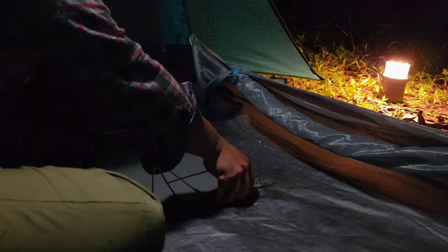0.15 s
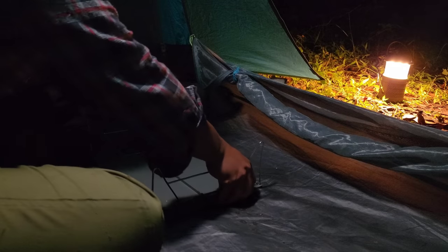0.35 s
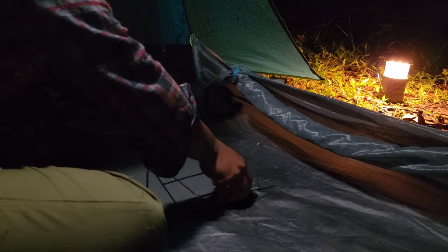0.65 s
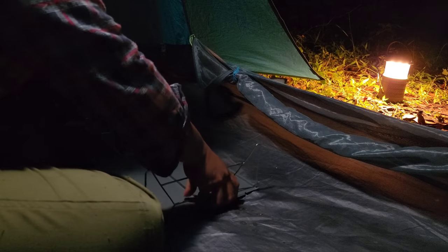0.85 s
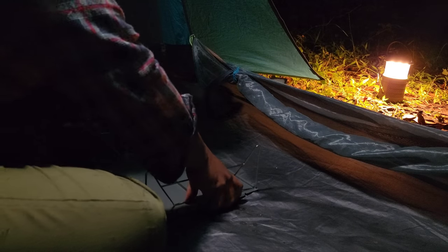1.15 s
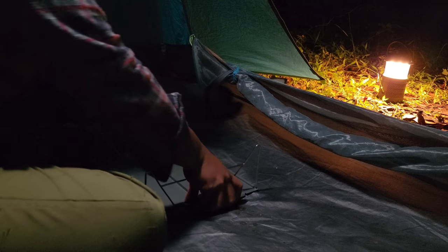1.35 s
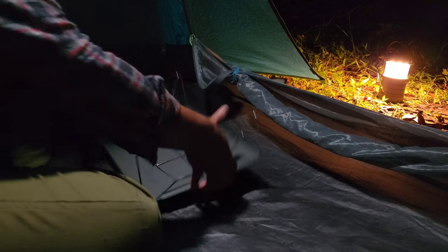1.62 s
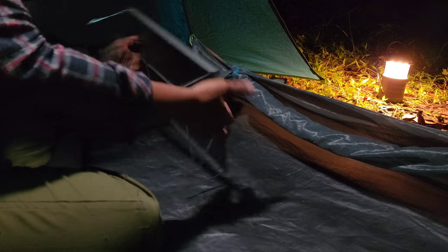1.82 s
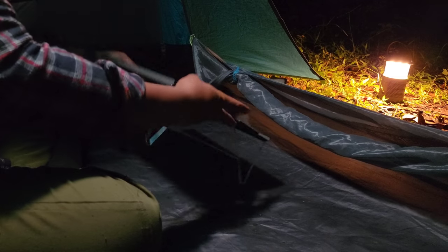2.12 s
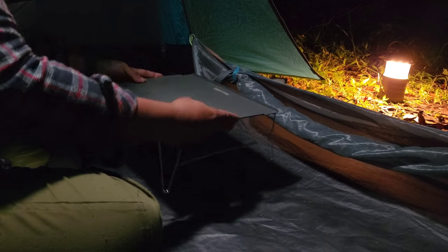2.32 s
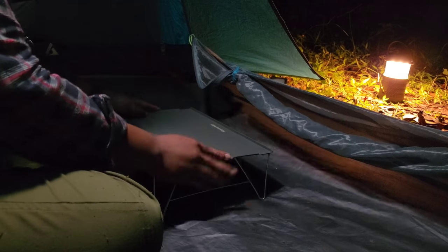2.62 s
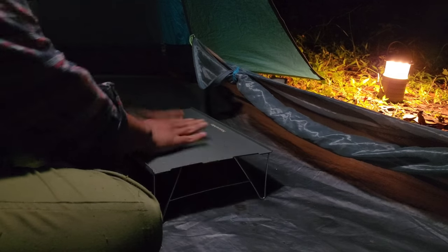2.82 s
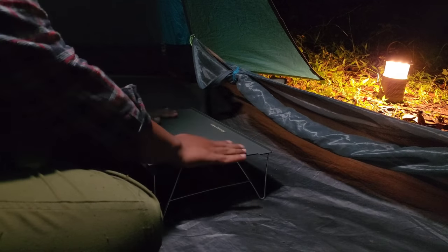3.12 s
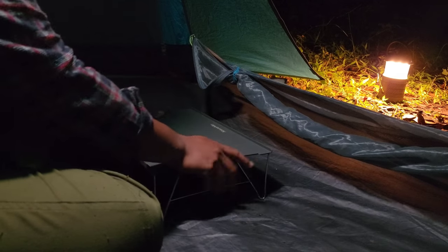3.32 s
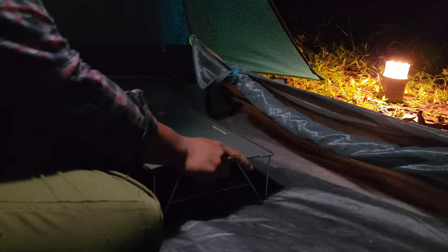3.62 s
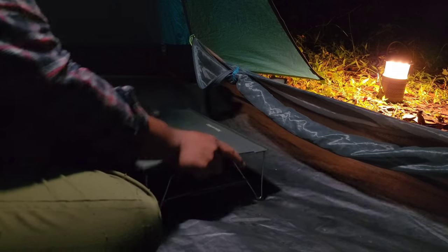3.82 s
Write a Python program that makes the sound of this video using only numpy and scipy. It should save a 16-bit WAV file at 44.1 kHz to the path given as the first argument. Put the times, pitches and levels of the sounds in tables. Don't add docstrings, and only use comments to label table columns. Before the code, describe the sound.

A small folding table is handled close up in a tent. Faint knocks lead to a loud metallic latch snap at 0.4 s, then light scrapes and knocks. A wire leg clicks free at 1.45 s, followed by tinks and rustles until 2.3. Hard thuds land near 2.55, 3.1 and 3.67 s, with palm scrapes between. Faint insects, hiss and distant rumble continue beneath.

```python
import sys
import numpy as np
from scipy import signal
from scipy.fft import rfft, irfft
from scipy.io import wavfile
from scipy.ndimage import uniform_filter1d, map_coordinates

SR = 44100
rng = np.random.default_rng(int(sys.argv[2]) if len(sys.argv) > 2 else 0)


def invert_db(x):
    u = np.asarray(x, float) / 20
    return 10 ** u


def int16_out(signal):
    q = np.round(np.clip(np.atleast_2d(signal).T, -1, 1) * 32767)
    wavfile.write(sys.argv[1], SR, q.astype(np.int16))


N = 174195
TIME = np.arange(N) / SR


def evened(x):
    return x / np.sqrt(np.mean(x ** 2) + 1e-20)


def read(points, hz):
    f, value = np.transpose(points)
    return np.interp(np.log(hz + 1), np.log(f + 1), value)


def add(mix, start_s, sound):
    k = max(round(start_s * SR), 0)
    part = mix[..., k:k + sound.shape[-1]]
    part += sound[..., :part.shape[-1]]


def tinted(x, gain):
    length = x.shape[-1]
    return irfft(rfft(x) * gain(np.fft.rfftfreq(length, 1 / SR)), length)


def hump(t, rise, fall, shape=1):
    before = np.exp(-3 * (t / abs(rise)) ** 2)
    after = np.exp(-2.3 * (np.maximum(t, 0) / abs(fall)) ** shape)
    return np.where(t < 0, before, after)


def struck(modes, rattle_s, chance, seconds, bounce_db=-16.0, spread_db=2):
    bounces_per_s = 900
    t = np.arange(0, seconds, 1 / SR)
    ring = np.zeros(len(t))
    for k, (hz, db, t60) in enumerate(modes):
        ring += (-1) ** k * invert_db(db - 60 * t / max(t60, .003)) * np.sin(2 * np.pi * hz * t)
    when, size, sign = chance[:, :len(t)]
    bounce_level = spread_db * np.minimum(-np.log(size + 1e-9), 2) + bounce_db
    bounces = (when < bounces_per_s / SR) * invert_db(bounce_level) * np.sign(sign - .5)
    blows = bounces * np.exp(-(t / max(rattle_s, .001)) ** 4) + (t == 0)
    out = signal.fftconvolve(blows, ring)[:len(t)]
    return out / abs(out).max()


# f/Hz, likeness 0-1
LIKENESS = [(250, 0.3), (950, 0.1), (4000, 0.043)]


def field(shape, patch_db, size, likeness=LIKENESS):
    frames, hz = N * 4 // size + 5, np.fft.rfftfreq(size, 1 / SR)
    a, b, c, d, patches = rng.standard_normal((frames, len(hz), 5)).T
    patches = uniform_filter1d(uniform_filter1d(patches, size=10, axis=0), size=8, axis=1)
    same = np.clip(read(likeness, hz), -1, 1)[:, None]
    left = a + 1j * b
    right = same * left + np.sqrt(1 - same ** 2) * (c + 1j * d)
    z = np.array([left, right]) * invert_db(shape(hz)[:, None] + patch_db * evened(patches))
    return evened(signal.istft(z, nperseg=size, noverlap=size * 3 // 4)[1][:, :N])


# f/Hz, level/dB per Hz
RUMBLE_COLOUR = [(20, -38), (35, -62), (55, 2.5), (85, 3), (130, -7.5), (200, -20), (350, -47.5)]
# t/s, level/dB
RUMBLE_SWELL = [(0, -42), (.4, -33.5), (.65, -34), (1.3, -35), (1.6, -40.5), (3.299, -37), (3.95, -38.5)]


def rumble():
    top_hz = RUMBLE_COLOUR[-1][0]
    noise = field(lambda hz: read(RUMBLE_COLOUR, hz) - 80 * (hz > top_hz), 3.3, 4096, [(60, 0.97)])
    return noise * invert_db(np.interp(TIME, *np.transpose(RUMBLE_SWELL)) + 2.5)


# f/Hz, level/dB per Hz
HISS_COLOUR = [(250, -3.5), (500, -8), (1500, -5), (3000, -6), (5700, -10.5), (8000, -9), (10300, -19.5),
               (15500, -18.5)]


def hiss():
    return invert_db(-48.5) * field(lambda hz: read(HISS_COLOUR, hz) - 60 * (hz < 200), 2.4, 1024)


# f/Hz, width/Hz, level/dB
INSECT_BANDS = [(6200, 500, -69), (6592, 390, -47.5), (6890, 330, -47), (3000, 120, -58.5),
                (4960, 520, -58)]


def insects():
    def power(hz):
        return sum(invert_db(2 * db) / w * np.exp(-4 * ((hz - f) / w) ** 2) for f, w, db in INSECT_BANDS)

    total = np.sqrt(sum(invert_db(2 * db) for f, w, db in INSECT_BANDS))
    return total * field(lambda hz: 10 * np.log10(power(hz) + 1e-30), .8, 512)


# peak t/s, rise t/s, fall t/s, level/dB, tilt/dB per octave
STROKES = [(0.031, 0.012, 0.05, -41, 2), (0.426, 0.0097, 0.022, -14, 0), (.74, 0.12, 0.089, -36, 2.5),
           (0.839, 0.071, 0.08, -40.5, 5.5), (.95, 0.11, 0.11, -43, 0.8), (1.21, 0.0033, 0.019, -36.5, 3),
           (1.27, 0.21, 0.13, -53, 6), (1.456, 0.014, 0.052, -26, 6.5), (1.557, 0.04, 0.043, -34.5, 1),
           (1.615, .008, 0.041, -44.5, 4.5), (1.698, 0.02, 0.026, -38, 6), (1.747, 0.014, 0.017, -30, 5.5),
           (1.839, 0.078, 0.067, -35, 4.5), (1.928, 0.011, 0.03, -25, 7), (2.121, 0.024, 0.12, -38.5, 5),
           (2.236, 0.0068, 0.03, -35.5, 5.5), (2.312, 0.0081, 0.031, -33, -5),
           (2.537, 0.013, 0.012, -17, 3.5), (2.571, 0.023, 0.031, -17, 2.1), (2.68, 0.06, 0.11, -50.5, 5),
           (2.819, 0.12, 0.16, -38, 5), (2.959, 0.055, 0.042, -40.5, 2.7), (3.15, 0.16, 0.11, -26, 7.5),
           (3.33, 0.19, 0.15, -40.5, 6), (3.52, 0.059, 0.072, -43, 2.5), (3.595, 0.012, 0.04, -34.5, -1.5),
           (3.678, 0.038, 0.031, -21.5, 4), (3.73, 0.037, 0.1, -41, 4), (3.87, 0.052, 0.071, -37.5, 4),
           (3.95, 0.03, .03, -29.5, 3)]
# f/Hz, level/dB per Hz
RUB_COLOUR = [(300, 17), (1400, 12.5), (3000, 8), (5800, 0.5), (8000, 1.5), (10400, -10), (12300, -6.5),
              (15200, -14.5)]


def scrapes():
    grains_per_s, grain_spread_db, slip_db = 8000, 3, 1.6
    grains = rng.random((3, N)) < grains_per_s / SR
    grains = grains * invert_db(grain_spread_db * rng.exponential(1, (3, N)))
    grains = grains * rng.standard_normal((3, N))
    grains = grains * invert_db(slip_db * evened(uniform_filter1d(rng.standard_normal(N), size=130)))
    shared_and_own = grains[0] + 1.9 * grains[1:]
    rub = evened(tinted(shared_and_own, lambda hz: invert_db(read(RUB_COLOUR, hz) - 10 * (hz < 250))))
    out = np.zeros((2, N))
    for s, rise, fall, db, tilt_db in STROKES:
        a, b = max(round((s - .2) * SR), 0), min(round((s + .3) * SR), N)
        stroke = evened(tinted(rub[:, a:b], lambda hz: invert_db(tilt_db * np.log2((hz + 100) / 4000))))
        out[:, a:b] += invert_db(db) * stroke * hump(TIME[a:b] - s, rise, fall, 0.42 + 8 * fall)
    return out


# t/s, peak level/dB, body f/Hz, brightness/dB per octave
TOP_KNOCKS = [(0.177, -40.5, 720, -3.5), (0.302, -33.5, 920, -0.5), (0.557, -38.5, 935, 2),
              (0.616, -37, 630, -2), (0.672, -25, 930, 0), (0.909, -27, 686, 0.5), (0.993, -30.5, 770, -4),
              (1.057, -41.5, 770, -0.5), (1.111, -40.5, 1140, -0.5), (1.208, -27.5, 760, 5.5),
              (1.4924, -12.5, 590, -2.5), (1.55, -23, 610, -3), (1.606, -24, 690, -0.5),
              (2.307, -19.5, 592, 0.5), (2.838, -23.5, 1300, 3), (2.8639, -21, 556, -5.5),
              (3.0917, -23, 1550, -2.5), (3.1015, -9, 602, -6), (3.236, -24.5, 1410, -9),
              (3.501, -36, 686, -2), (3.527, -31.5, 1480, -3), (3.586, -19, 710, 2.5),
              (3.639, -38, 600, -4.5), (3.845, -23.5, 1580, -1), (3.87, -42, 990, 1)]
# multiple of the body pitch, width/Hz, level/dB
TOP_MODES = [(.66, 320, -6.5), (1, 260, -1), (1.55, 320, -4), (2.2, 1130, 2.5), (3.3, 230, -8),
             (5, 2700, -0.5)]


def knocks():
    contact_lag_s, hardness = 0.001715, 0.48
    out = np.zeros(N)
    for s, db, hz, bright_db in TOP_KNOCKS:
        body = [(hz * m, mode_db + bright_db * np.log2(m), 2.14 / w) for m, w, mode_db in TOP_MODES]
        blow = struck(body, 0.0064, rng.random((3, 6000)), .06)
        add(out, s + contact_lag_s, invert_db(db + 8.5) * signal.lfilter([hardness], [1, hardness - 1], blow))
    return out


# f/Hz, level/dB, time to fall 60 dB t/s
LATCH_MODES = [(816, -6, 0.026), (1156, -4.5, 0.027), (1480, -3.5, 0.024), (2650, 1, 0.014),
               (3760, 3, 0.0061), (4800, -16, 0.012), (7800, -12, 0.0066)]


def latch():
    out, chance = np.zeros(N), rng.random((3, 6000))
    snap = struck(LATCH_MODES, 0.012, chance, .12, bounce_db=6.0, spread_db=-5.0)
    add(out, 0.4202, invert_db(-2.5) * snap)
    return out


# t/s, level/dB, f/Hz, fall t/s
GROUND_THUDS = [(0.423, -22, 161, 0.014), (1.496, -16.5, 139, 0.017), (2.539, -18.5, 141, 0.01),
                (2.564, -9.5, 101, 0.025), (2.869, -31, 200, 0.038), (2.956, -22, 211, 0.0047),
                (3.102, -17, 150, 0.018), (3.653, -19.5, 112, 0.02), (3.672, -3.5, 140, 0.0095),
                (3.684, -11.5, 114.6, 0.015), (3.945, -20.5, 123, 0.018)]
# multiple of its pitch, level/dB
THUD_OVERTONES = [(2.1, -10), (3.6, -21.5), (5.4, -14.5)]


def thuds():
    out, t = np.zeros(N), np.arange(-.04, .12, 1 / SR)
    for s, db, hz, fall in GROUND_THUDS:
        push = np.sin(2 * np.pi * hz * t)
        for (multiple, overtone_db), phase in zip(THUD_OVERTONES, rng.random(4)):
            push += invert_db(overtone_db) * np.sin(2 * np.pi * (multiple * hz * t + phase))
        add(out, s - .04, invert_db(db) * push * hump(t - 0.11 / hz, 0.43 * fall, fall, 0.72))
    return out


# t/s, level/dB
CLASP_TICKS = [
    (1.2092, -46),
    (1.4545, -12),
    (1.4585, -10),
    (1.4638, -17),
    (1.9265, -20),
    (1.9315, -35),
    (2.537, -13),
    (2.543, -21),
    (3.671, -13),
]
# f/Hz, level/dB, time to fall 60 dB t/s
CLASP_MODES = [(5180, -22, .02), (6250, -1, .018), (7800, 2, .02), (9600, -4, 0.017), (10110, 0, 0.022),
               (12000, -1, 0.018), (13340, -1, 0.024), (14500, -9, .015)]


def clasp_ticks():
    out = np.zeros(N)
    for s, db in CLASP_TICKS:
        add(out, s, invert_db(db) * struck(CLASP_MODES, 0.0011, rng.random((3, 2000)), .04, bounce_db=-2.0))
    return out


# t/s, level/dB, f/Hz that wakes most, chatter t/s
WIRE_TOUCHES = [(1.4545, -21.5, 3000, 0.012), (1.693, -23.5, 3000, 0.0038), (1.700, -22.5, 3640, 0.0044),
                (1.742, -20, 2740, 0.0047), (1.750, -30.5, 1690, 0.0049), (1.766, -26, 4230, 0.008),
                (1.835, -22.5, 1570, 0.0055), (1.845, -28.5, 3220, 0.0042), (1.926, -26.5, 7100, 0.012),
                (2.117, -27.5, 2640, 0.0048), (2.121, -27.5, 7500, 0.0052), (2.135, -32, 2580, .001),
                (2.148, -27.5, 2580, 0.0011), (2.149, -31, 8000, 0.0044), (2.235, -31.5, 6350, 0.0037),
                (2.242, -29, 3570, 0.011), (2.534, -19, 2220, 0.0049), (2.841, -40, 3220, .002),
                (2.880, -38, 3100, 0.0024), (3.588, -29, 2780, 0.0029)]
# f/Hz, level/dB, time to fall 60 dB t/s
WIRE_MODES = [(1034, -4, .14), (1238, -6, .16), (1432, 1, .13), (1478, -2, .09), (2110, -8, .06),
              (2444, -5, .07), (2630, 4, .15), (2950, -7, .13), (3138, -5, .08), (3400, -1, .07),
              (3565, 1, .1), (4800, -10, .045), (6320, -1, .03), (7700, 0, .035)]


def tinks():
    focus_db = 12.0
    out, chance = np.zeros(N), rng.random((len(WIRE_TOUCHES), 3, 12000))
    for (s, db, focus_hz, chatter_s), touch in zip(WIRE_TOUCHES, chance):
        wire = []
        for hz, mode_db, t60 in WIRE_MODES:
            away_db = focus_db * np.log2(hz / focus_hz) ** 2
            wire.append((hz, mode_db + rng.standard_normal() - away_db, t60))
        add(out, s, invert_db(db) * struck(wire, chatter_s, touch, .27, bounce_db=-4.0))
    return out


# t/s, level/dB, fall t/s
TOP_RINGS = [
    (1.754, -44.5, 0.099),
    (1.851, -40, 0.061),
    (2.582, -19.5, 0.031),
    (3.512, -33.5, 0.051),
    (3.688, -14, 0.0095),
]


def top_rings():
    out, t = np.zeros(N), np.arange(-.03, .15, 1 / SR)
    tone = np.sin(2 * np.pi * 487 * t)
    for s, db, fall in TOP_RINGS:
        add(out, s + t[0], invert_db(db) * hump(t, .018, fall, 1.34) * tone)
    return out * (1 + 0.25 * evened(uniform_filter1d(rng.standard_normal(N), size=300)))


def hum():
    return invert_db(-55) * np.sin(2 * np.pi * 261 * TIME) * np.exp(-((TIME - 2.84) / 1.15) ** 4)


def near_insect():
    start_s, strokes_per_s, pitch_hz, width_hz = 3.42, 32, 12600, 3600
    strokes = .7 + np.sin(np.pi * strokes_per_s * TIME) ** 4
    strokes = np.clip((TIME - start_s) / .03, 0, 1) * strokes
    return invert_db(-45.5) * strokes * field(lambda hz: -40 * ((hz - pitch_hz) / width_hz) ** 2, 1.0, 256)


# f/Hz, time to fall 60 dB t/s
TENT_DECAY = [(200, 0.045), (4000, 0.034), (12000, 0.054)]


def tent(x):
    taps = np.zeros((2, 8000))
    at = np.arange(60, 7980, 20) + rng.integers(0, 20, (2, 396))
    np.put_along_axis(taps, at, rng.choice([-1., 1.], at.shape), 1)
    hz, t, z = signal.stft(taps, SR, nperseg=128)
    tail = signal.istft(z * invert_db(-60 * t / read(TENT_DECAY, hz)[:, None]), SR, nperseg=128)[1]
    return signal.fftconvolve(x, tail / np.linalg.norm(tail[0]), axes=1)[:, :N]


# t/s, lag/samples
LEFT_LAG = [(0, -6.5), (.7, 15), (1.7, 6), (2.2, 9.5), (2.7, 2.5), (3.5, -6)]
# f/Hz, level/dB
LEFT_LEAN = [(60, -0.5), (1000, 4.5), (3500, 5.5), (9500, 4), (15000, 5.5)]


def scene():
    near = latch() + knocks() + tinks() + clasp_ticks() + top_rings() + scrapes()
    lag = np.interp(TIME, *np.transpose(LEFT_LAG))
    near = np.array([map_coordinates(near[0], [np.arange(N) - lag], order=3), near[1]])
    reflections = tinted(tent(near), lambda hz: hz ** 2 / (hz ** 2 + 420.0 ** 2))
    table = near + invert_db(0.5) * reflections + thuds()
    table = tinted(table, lambda hz: invert_db(np.array([[.5], [-.5]]) * read(LEFT_LEAN, hz)))
    return table + rumble() + hiss() + hum() + near_insect() + insects()


def top_cut(x):
    return signal.sosfilt(signal.butter(12, 16480, fs=SR, output="sos"), x)


def record(dry):
    ceiling, edge_hz = .93, 15550
    clipped = np.clip(dry, -ceiling, ceiling)
    mix = signal.oaconvolve(clipped, signal.firwin(401, edge_hz, fs=SR)[None], "same")
    return top_cut(mix)


dry = scene()
out = record(dry)
int16_out(out)
```